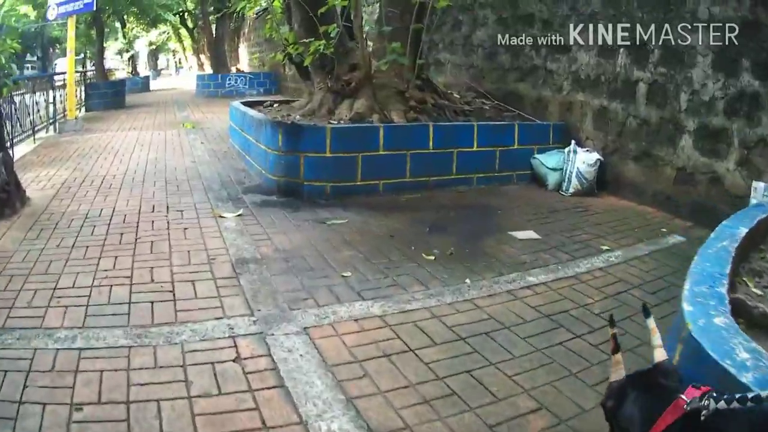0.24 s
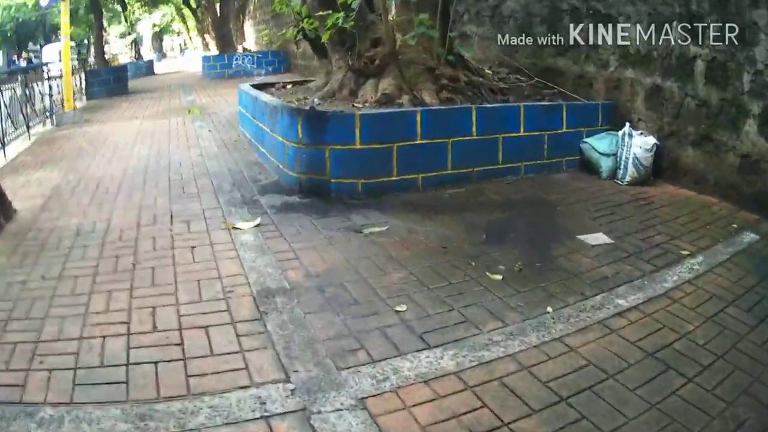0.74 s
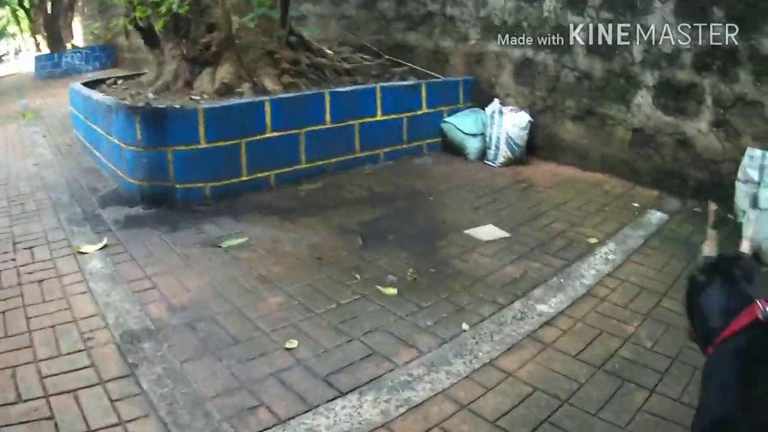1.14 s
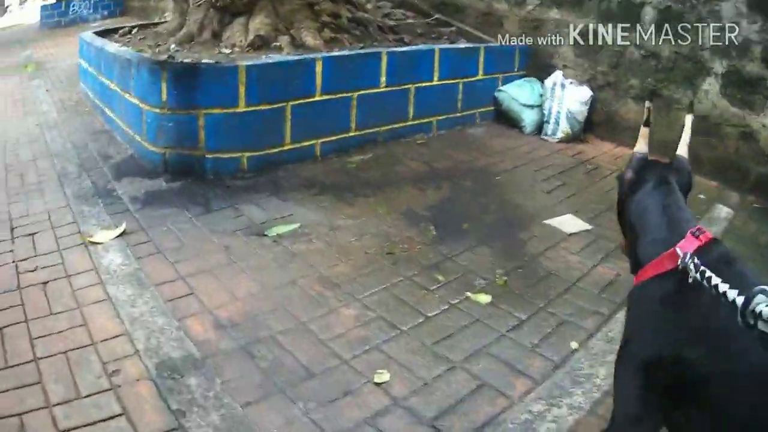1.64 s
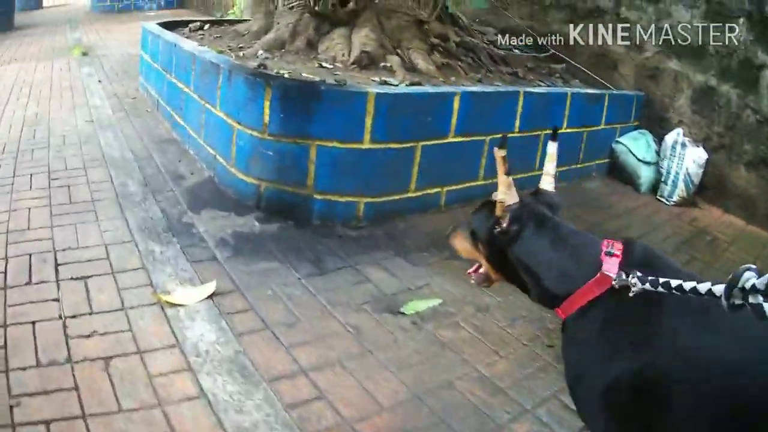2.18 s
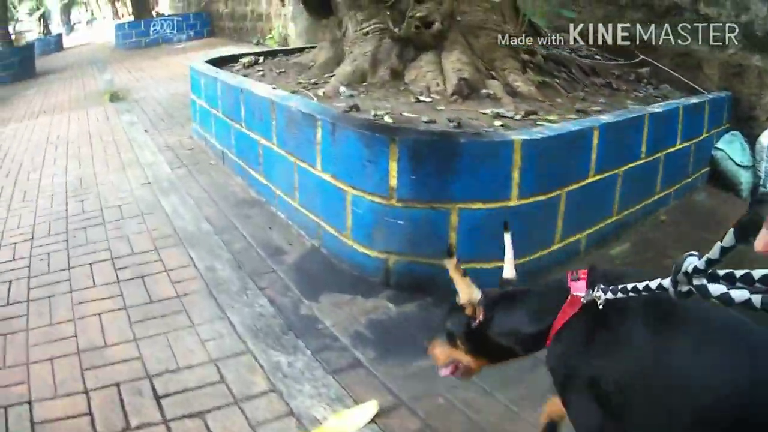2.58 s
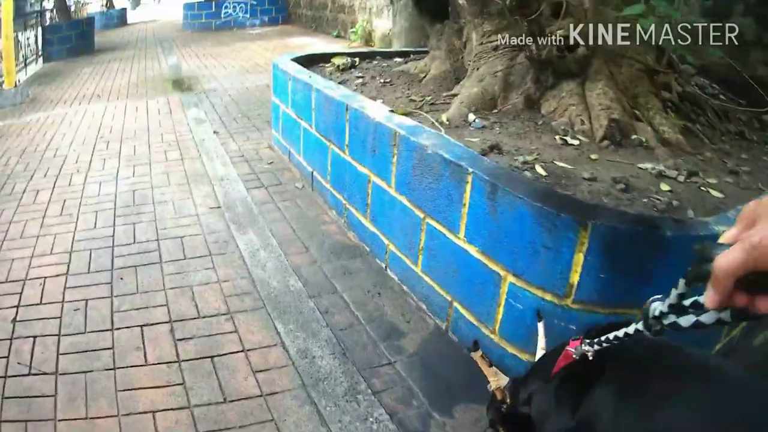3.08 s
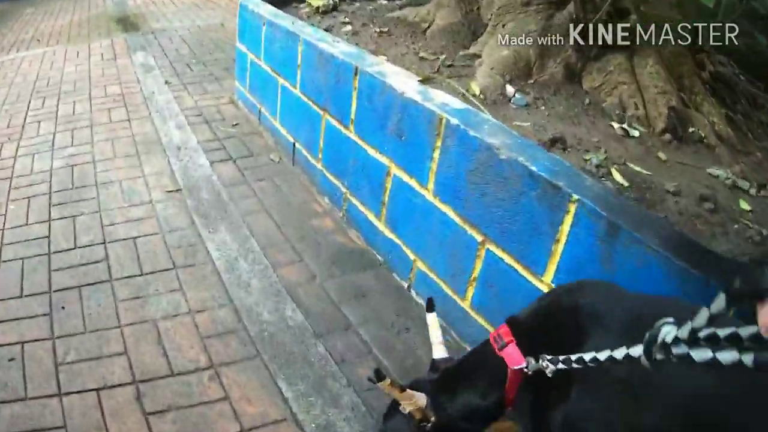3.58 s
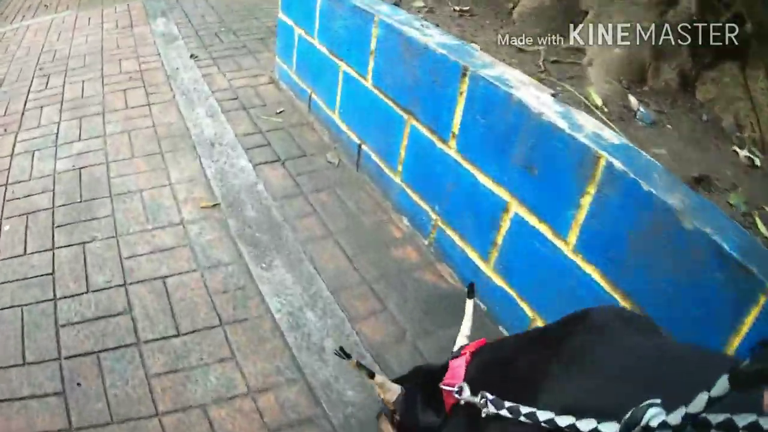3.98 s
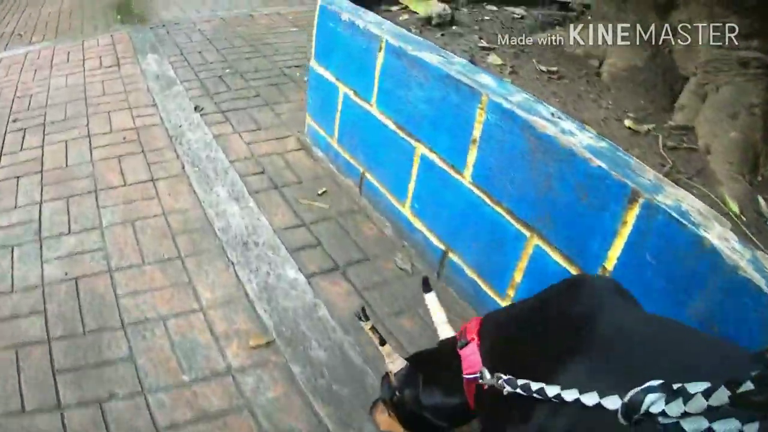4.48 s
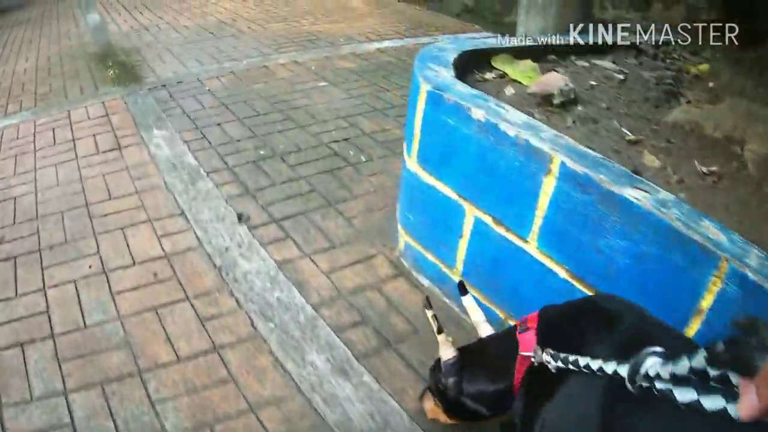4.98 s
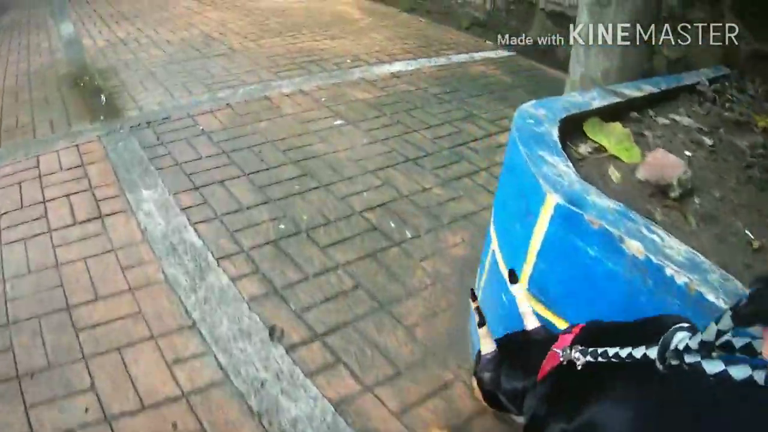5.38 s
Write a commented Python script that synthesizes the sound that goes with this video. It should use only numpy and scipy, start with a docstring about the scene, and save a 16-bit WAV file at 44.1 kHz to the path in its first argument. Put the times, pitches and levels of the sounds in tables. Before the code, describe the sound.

Outdoors on a paved path, birds call and whistle with soft echo while a dog's lead clicks, air rumbles on the microphone, and a closer warbler finishes.

```python
"""Far birds call hoarsely deep in the trees, over town murmur, a motor's hum and air on a hand-held microphone.
A dog's lead clicks close by; a whistler sends high arches past a walled, paved park path, and a bump thuds.
Later a nearer bird warbles low phrases with thin peeps among them, and a small one twitters at the end.
Birds are sine tones that follow drawn pitch lines, with random shake and decaying noise as the park's echo;
murmur and air are shaped noise, the motor two wavering tones, the clicks struck modes, the bumps pressure pulses."""
import sys
import numpy as np
from scipy import signal
from scipy.fft import rfft, irfft, next_fast_len
from scipy.io import wavfile
from scipy.ndimage import uniform_filter1d

SR = 44100
rng = np.random.default_rng(int(sys.argv[2]) if len(sys.argv) > 2 else 0)


def unload_wav(signal):
    """Save mono or channel-first audio to the path in sys.argv[1] as 16-bit WAV at rate SR, clipped to [-1, 1]."""
    wavfile.write(
        sys.argv[1],
        SR,
        np.round(np.clip(np.atleast_2d(signal).T, -1, 1) * 32767).astype(np.int16),
    )


N = 248283
TIME = np.arange(N) / SR

# phrases of the near warbler, a short chirr, a pause, and a slur that climbs and drops into a trill:
# [t/s, chirr length/s, chirr f/Hz, chirr level/dB, pause/s, climb/s, drop/s, top f/Hz, slur level/dB]
WARBLE_PHRASES = [ (4.087, .05, 1871, -19.5, .045, .053, .035, 2421, -19.5),
                  (4.527, .023, 1790, -20, .111, .031, 0.049, 2536, -21.5),
                  (5.008, .047, 1784, -24, .079, .051, 0.015, 2556, -22)]


def from_db(db):
    """Decibels to gain."""
    return 10 ** (np.asarray(db) / 20)


def rms_one(x):
    """Scale to rms 1."""
    return x / np.sqrt(np.mean(x ** 2) + 1e-20)


def level(rows):
    """Gain over time from rows of [t/s, level/dB]."""
    return from_db(np.interp(TIME, *np.transpose(rows)))


def low_pass(x, hz, order=2):
    """Causal Butterworth low-pass."""
    return signal.sosfilt(signal.butter(order, min(hz, .45 * SR), fs=SR, output="sos"), x + 1e-18)


def drift(rate_hz):
    """Random wander up to about the given rate; rms 1."""
    settled = low_pass(rng.standard_normal(N + SR), rate_hz)[SR:]
    return rms_one(settled)


def noise(colour):
    """Noise with the spectrum in rows of [f/Hz, relative level/dB]; rms 1."""
    hz, db = np.transpose(colour)
    size = next_fast_len(N)
    bins = np.maximum(np.fft.rfftfreq(size, 1 / SR), 1)
    gain = from_db(np.interp(np.log(bins), np.log(hz), db))
    return rms_one(irfft(rfft(rng.standard_normal(size)) * gain, size)[:N])


def turning(hz):
    """Phase of an oscillator that follows a pitch."""
    return 2 * np.pi * np.cumsum(hz) / SR


def song(notes, glide_s, fade_s):
    """Pitch, gain and roughness from (s, Hz, dB, 0-1) points; the syrinx rounds corners and fades between notes."""
    hz, gain, rough = np.full(N, 2000.), np.zeros(N), np.zeros(N)
    glide = max(1, int(glide_s * SR))
    for note in notes:
        s, pitch, db, depth = np.transpose(sorted(note))
        on = (TIME > s[0] - fade_s) & (TIME < s[-1] + fade_s)
        t = TIME[on]
        edge = np.clip(np.minimum(t - s[0], s[-1] - t) / fade_s + 1, 0, 1)
        hz[on] = uniform_filter1d(np.interp(t, s, pitch), glide, mode="nearest")
        gain[on] = from_db(np.interp(t, s, db)) * np.sin(np.pi / 2 * edge) ** 2
        rough[on] = np.interp(t, s, np.clip(depth, 0, 1))
    return hz, np.sqrt(2) * gain, rough  # root two: the levels are those of a sine's rms


def park(x, t60, build_s):
    """Diffuse echo of trunks, leaves and walls: it builds up, then dies away; unit energy."""
    t = TIME[:SR]
    echo = rng.standard_normal(SR) * from_db(-60 * t / t60) * (1 - np.exp(-t / build_s))
    return signal.fftconvolve(x, echo / np.sqrt(np.sum(echo ** 2)))[:N]


def town_murmur():
    """The town beyond the park: broad noise that slowly rises and falls."""
    # swell of the murmur: [t/s, level/dB]
    town_level = [(0, -51.5), (2.3, -54.5), (3, -49.5), (4.8, -49.5), (5.63, -56)]
    # its spectrum: [f/Hz, relative level/dB]
    town_colour = [(140, 0.5), (350, -4), (650, -8.5), (900, -4.5), (1150, 0.5), (1350, -10), (2500, -2.5),
                   (4400, -41), (7000, -39.5), (9000, -54), (15000, -48)]
    return level(town_level) * noise(town_colour)


def wind():
    """Air on the microphone: deep noise that comes in swells and flutters at random."""
    # swells before the flutter: [t/s, level/dB]
    wind_level = [(0, -48.5), (.5, -32.5), (1.15, -33), (1.5, -48), (2.55, -46), (2.8, -36.5), (3.4, -48.5),
                  (3.7, -49), (5.1, -46.5), (5.63, -51)]
    # spectrum of the air noise: [f/Hz, relative level/dB]
    wind_colour = [(15, 4), (35, -10), (80, -13), (320, -32.5), (800, -78.5)]
    flutter = from_db(2.5 * drift(9))
    return level(wind_level) * flutter * noise(wind_colour)


def motor(hum_hz=102.5, drone_hz=56.8, hum_trim_db=-1, drone_trim_db=-1):
    """A distant motor: two low tones, hum and drone, whose pitch wavers a little."""
    # the hum before its trim: [t/s, level/dB]
    hum_level = [(0, -52), (1.1, -43.5), (2.4, -43.5), (3.95, -45), (4.25, -55.5), (5.63, -54.5)]
    # the drone before its trim: [t/s, level/dB]
    drone_level = [(0, -58), (3.9, -59), (4.7, -43.5), (5.63, -65.5)]
    hum_phase = turning(hum_hz * (1 + 0.0081 * drift(0.99)))
    drone_phase = turning(drone_hz * (1 + 0.0053 * drift(9)))
    hum = from_db(hum_trim_db) * level(hum_level) * np.sin(hum_phase)
    drone = from_db(drone_trim_db) * level(drone_level) * np.sin(drone_phase)
    return np.sqrt(2) * (hum + drone)


FAR_FADE_S = 0.022  # fade at both ends of a far call


def far_call(s, length_s, first_hz, last_hz, db, hoarse, fade_db=4, settle=2.5):
    """A call slides exponentially towards its last pitch (settle: time constants per call) while it fades."""
    u = np.linspace(0, 1, 8)
    hz = last_hz + (first_hz - last_hz) * np.exp(-settle * u)
    return list(zip(s + u * length_s, hz, db - fade_db * u, np.full_like(u, hoarse)))


def far_birds(jitter=0.0919, foliage_cut_hz=3640, direct_db=-5, near_db=-5, wet_db=-4.5):
    """Two birds deep in the trees share the calls, hoarse and fluttering, blurred by the foliage."""
    # calls, before the mix: [t/s, length/s, first f/Hz, last f/Hz, level/dB, hoarseness/0-1]
    far_calls = [ (0, 0.078, 2050, 1868, -47, 0.9), (.158, 0.054, 2368, 2270, -38, 0.77),
                 (0.201, .1, 1950, 1728, -45.5, 0.77), (.35, 0.1, 2642, 2400, -46.5, 0.66),
                 (0.338, 0.14, 2060, 2015, -40, .35), (0.487, 0.17, 2420, 2340, -40.5, 0.48),
                 (.59, 0.11, 1855, 1611, -44, 0.67), (.68, 0.17, 2450, 2347, -43.5, 0.3),
                 (.74, .34, 2060, 1982, -43.5, 0.43), (2.819, 0.067, 2000, 1580, -39.5, 0.97),
                 (2.975, 0.18, 1960, 1931, -34.5, 0.39), (3.239, 0.077, 1960, 1910, -39, 0.39),
                 (3.338, .035, 2750, 2360, -36.5, .95), (3.368, .08, 1823, 1644, -37, .95),
                 (3.5, 0.057, 1920, 1881, -37.5, .85), (3.575, 0.12, 1890, 1866, -29, 0.07),
                 (3.661, .14, 2145, 1876, -37.5, 0.82), (3.826, .02, 3010, 2748, -41.5, .95),
                 (3.848, .08, 2584, 2412, -26, .75), (4.002, 0.068, 2400, 2056, -33.5, 0.72)]
    voice = 0
    for calls in (far_calls[::2], far_calls[1::2]):
        notes = [far_call(*row) for row in calls]
        hz, gain, rasp = song(notes, glide_s=0.0047, fade_s=FAR_FADE_S)
        flutter = from_db(3.9 * rasp * drift(71))
        phase = turning(hz * (1 + jitter * rasp * drift(260)))
        voice = voice + gain * flutter * np.sin(phase)
    voice = low_pass(voice, foliage_cut_hz, order=5)
    leaves = from_db(near_db) * park(voice, t60=0.027, build_s=0.0076)
    return from_db(direct_db) * voice + leaves + from_db(wet_db) * park(voice, t60=0.88, build_s=0.0057)


def lead_clicks(soft_hz=2400):
    """Short dull clicks of the lead close by, each striking all the decaying modes of its clip."""
    # strikes: [t/s, level/dB]
    clicks = [(.552, -25.5), (.682, -29.5), (.847, -32), (.987, -38.5), (1.737, -34.5), (1.851, -35),
              (2.823, -32.5)]
    click_modes = [(700, -1, 0.0089), (1030, -8, 0.022), (1774, 3.5, 0.018)]
    taps, out = np.zeros(N), 0
    for s, db in clicks:
        taps[int(s * SR)] = from_db(db)
    for k, (hz, db, t60) in enumerate(click_modes):
        r = from_db(-60 / (t60 * SR))  # decay per sample
        w = 2 * np.pi * hz / SR
        ring = signal.lfilter([0, np.sin(w)], [1, -2 * r * np.cos(w), r * r], taps + 1e-18)
        out = out + (-1) ** k * from_db(db) * ring
    return low_pass(out, soft_hz, order=4)


def arch(s, climb_s, fall_s, top_hz, bend, db, rasp, broken_db, broken_rasp):
    """One whistle: a parabola up, a bent line down, its rasp changing as the pitch gives way."""
    foot_hz, onset_db, onset_share = 2212, 19, 0.44  # starts low and weak, swells over this share of the climb
    strain_hz, strain_db_per_hz = 5100, .009  # the voice thins out above this pitch
    break_from, break_to, dying_db = .2, 0.422, 1.5  # shares of the pitch drop; loss at the foot
    u = np.linspace(-1, 1, 41)
    climb, fall = np.maximum(-u, 0), np.maximum(u, 0)
    drop = fall ** bend
    t = s + climb_s * (1 - climb) + fall_s * fall
    hz = top_hz - (top_hz - foot_hz) * (climb ** 2 + drop)
    broken = np.interp(drop, [break_from, break_to], [0, 1])
    onset_loss = onset_db * np.maximum(1 - (1 - climb) / onset_share, 0)
    strain_loss = strain_db_per_hz * np.maximum(hz - strain_hz, 0)
    loss_db = onset_loss + strain_loss + dying_db * drop ** 4
    note_db = db + broken * (broken_db - db) - loss_db
    return list(zip(t, hz, note_db, rasp + broken * (broken_rasp - rasp)))


def peep(s, length_s, top_hz, db, foot_hz=2730, edge_db=3):
    """A shallow, even arch of pure tone, loudest at its top and weaker at both ends."""
    u = np.linspace(0, 1, 15)
    sag = (2 * u - 1) ** 2
    hz = top_hz - (top_hz - foot_hz) * sag
    return list(zip(s + u * length_s, hz, db - edge_db * sag, np.zeros_like(u)))


def whistler(waver=.009, jitter=0.12, hiss_db=-12.0, direct_db=-4.5, scatter_db=-3, wet_db=-3):
    """Arched whistles and peeps; low raspy tones turn reedy, and rasp shakes the pitch and adds hiss."""
    # arches, before the mix: [t/s, climb/s, fall/s, top f/Hz, bend of the fall (1 = straight), level/dB,
    # rasp/0-1, level once broken/dB, rasp once broken/0-1]
    whistles = [ (.79, .095, .15, 3110, 1.3, -47, 0.023, -49.5, .9),
                (1.413, 0.1, 0.041, 3900, .9, -44, 0.19, -40, 1),
                (1.72, 0.11, 0.072, 5498, 3.8, -39, 0.034, -42, .8),
                (2.146, .104, .164, 5250, 1.35, -36, .028, -40.5, 0.74),
                (2.555, .096, 0.035, 3930, .8, -35.5, 0.17, -33, 0.89),
                (2.837, 0.11, 0.06, 5790, 3.1, -37.5, .04, -35, 0.37)]
    # thin, clean peeps, before the mix: [t/s, length/s, top f/Hz, level/dB]
    peeps = [(3.1, .22, 3600, -66.5), (4.41, 0.1, 3032, -48.5), (5.018, .122, 3083, -55.5),
             (5.477, 0.18, 3440, -63.5)]
    # spectrum of the hiss: [f/Hz, relative level/dB]
    rasp_colour = [(1200, -13.5), (2200, -2.5), (5000, 8.5), (7800, -23), (8500, -22), (13000, -42.5)]
    reedy_below_hz, pure_above_hz = 3600, 4700  # overtones sound only in the low register
    fifth_db, octave_db = -13, -23  # reedy partials against the main tone
    wall_echo_s, wall_echo_db = 0.023, -13.5  # the whistle comes back once from the stone wall
    notes = [arch(*row) for row in whistles] + [peep(*row) for row in peeps]
    hz, gain, rasp = song(notes, glide_s=0.008, fade_s=0.012)
    phase = turning(hz * (1 + (waver + jitter * rasp ** 3) * drift(370)))
    low_register = np.interp(hz, [reedy_below_hz, pure_above_hz], [1, 0])
    reedy = np.clip(12 * rasp - .6, 0, 1) * low_register
    partials = from_db(fifth_db) * np.sin(3 * phase / 2) + from_db(octave_db) * np.sin(2 * phase)
    tone = np.sin(phase) + reedy * partials
    hiss = np.minimum(20 * rasp, 1) ** 2 * from_db(hiss_db) * noise(rasp_colour)
    voice = low_pass(gain * (tone + hiss), 8200, order=7)
    wall = from_db(wall_echo_db) * np.interp(TIME - wall_echo_s, TIME, voice)
    # the branches send the note back within milliseconds, so it thickens and beats against itself
    scatter = from_db(scatter_db) * park(voice, t60=0.017, build_s=0.0025)
    return from_db(direct_db) * voice + wall + scatter + from_db(wet_db) * park(voice, t60=0.82, build_s=0.0069)


def bumps(dull_hz=110, stop=.505):
    """Pressure builds on the microphone port, lets go and swings back; the big bump bottoms out in a dull knock."""
    # bumps, before dulling: [t/s, push level/dB, rebound level/dB, build-up/s, recovery/s]
    bump_rows = [(1.2238, 2.5, -5, 0.0059, 0.017), (3.366, -16.5, -34, 0.0076, .03)]
    pressure = np.zeros(N)
    for s, push_db, rebound_db, build_s, recover_s in bump_rows:
        apart = np.abs(TIME - s)
        push = from_db(push_db) * np.exp(-apart / build_s)
        rebound = -from_db(rebound_db) * np.exp(-apart / recover_s)
        pressure += np.where(TIME < s, push, rebound)
    saturated = np.clip(low_pass(pressure, dull_hz, order=1), -stop, stop)
    return low_pass(saturated, 910, order=1)


def warble_notes():
    """Two notes a phrase: the level chirr, then the slur with its sagging trill."""
    chirr_depth, slur_depth, trill_depth = 0.86, 0.028, 1  # how deeply each part throbs, 0-1
    slur_from_hz, slur_bend, slur_swell_db = 2130, 1.8, 2.5  # the climb steepens and swells
    trill_s, trill_from_hz, trill_sag_hz = .093, 1927, 89.7
    trill_from_db, trill_fade_db = -23.5, 3
    notes, u = [], np.linspace(0, 1, 8)
    for s, chirr_s, chirr_hz, chirr_db, pause_s, climb_s, drop_s, top_hz, db in WARBLE_PHRASES:
        notes.append([(t, chirr_hz, chirr_db, chirr_depth) for t in (s, s + chirr_s)])
        slur_at = s + chirr_s + pause_s
        trill_at = slur_at + climb_s + drop_s
        climb_hz = slur_from_hz + (top_hz - slur_from_hz) * u ** slur_bend
        climb_db = db - slur_swell_db * (1 - u)
        climb = list(zip(slur_at + u * climb_s, climb_hz, climb_db, np.full_like(u, slur_depth)))
        trill = [(trill_at + k * trill_s, trill_from_hz - k * trill_sag_hz,
                  trill_from_db - k * trill_fade_db, trill_depth) for k in (0, 1)]
        notes.append(climb + trill)
    return notes


def scrapes(level_db=-38, weaker_db=4, lead_s=0.0036, width_s=0.011):
    """Each phrase opens with a short hoarse burst of noise, weaker from phrase to phrase."""
    gain = 0
    for k, row in enumerate(WARBLE_PHRASES):
        from_peak_s = TIME - row[0] + lead_s
        gain = gain + from_db(level_db - weaker_db * k) * np.exp(-.5 * (from_peak_s / width_s) ** 2)
    return gain * noise([(1300, -20), (1700, 8), (2400, 4.5), (3400, -9), (4300, -25), (6500, -36), (12000, -51)])


def warbler(trill_hz=52, swing=0.029, throb=0.92, second_db=-37, third_db=-38, edge_db=-49,
            scatter_db=-12, wet_db=-8):
    """Chirrs and clean slurs that break into a trill, in which pitch and loudness throb together."""
    hz, gain, depth = song(warble_notes(), glide_s=0.012, fade_s=.006)
    trill = turning(trill_hz * (1 + 0.11 * drift(27.2)))
    shake = (0.0025 + 0.018 * depth) * drift(220)
    phase = turning(hz * (1 + swing * depth * np.sin(trill) + shake))
    gain = gain * (1 - min(throb, 1) * depth * (1 + np.sin(trill + 1.94)) / 2)
    voice = gain * np.sin(phase) + scrapes()
    # overtones flicker up with effort, and the highest peaks get a sharp edge
    effort = gain / gain.max()
    second = (1 - depth / 2) * from_db(second_db) * np.sin(2 * phase)
    third = depth * from_db(third_db) * np.sin(3 * phase)
    overtones = effort * drift(90) * (second + third)
    edge_gain = from_db(edge_db + 7.5 * (hz / 2400) ** 20)
    edge = effort * edge_gain * noise([(2000, 2.5), (7000, 0), (14000, -11)])
    scatter = from_db(scatter_db) * park(voice, t60=0.12, build_s=0.0047)
    return voice + gain * (overtones + edge) + scatter + from_db(wet_db) * park(voice, t60=0.79, build_s=0.0077)


def flicks(db, count):
    """A zigzag of flicks from one top pitch, deep and shallow in turn; the deep ones fade as they drop."""
    start_s, per_s, rise_s = 5.533, 68, 0.0013
    top_hz, deep_hz, shallow_hz, deep_loss_db = 6620, 3790, 5650, 3.5  # corners, before the glide rounds them
    deep, shallow = (deep_hz, db - deep_loss_db, 0), (shallow_hz, db, 0)
    note = [(start_s, *deep)]
    for k in range(count):
        s = start_s + k / per_s
        note.append((s + rise_s, top_hz, db, 0))
        note.append((s + 1 / per_s, *(shallow if k % 2 else deep)))
    return [note]


def small_bird(level_db=-45, jitter=0.052, wet_db=-3):
    """A very fast zigzag twitter: one sine whose pitch also shakes at random."""
    hz, gain, _ = song(flicks(level_db, count=5), glide_s=0.0076, fade_s=0.00221)
    voice = gain * np.sin(turning(hz * (1 + jitter * drift(870))))
    return voice + from_db(wet_db) * park(voice, t60=0.33, build_s=0.0053)


def scene():
    """Birds over the town's murmur and a far motor, with the lead and microphone sounds close by."""
    background = town_murmur() + wind() + motor()
    birds = far_birds() + whistler() + warbler() + small_bird()
    return (background + birds + lead_clicks() + bumps())[None]


def record(dry, split_hz=900, ceiling_db=-23.5, window_s=0.0019, cutoff_hz=15400):
    """A fast limiter holds down the treble band, so the loudest notes get flat tops; the top is cut."""
    bass = signal.sosfiltfilt(signal.butter(2, split_hz, fs=SR, output="sos"), dry)
    treble = dry - bass
    envelope = np.abs(signal.hilbert(treble, next_fast_len(N))[:, :N])
    loudness = uniform_filter1d(envelope, max(1, int(window_s * SR)))
    limited = treble / np.maximum(1, loudness / from_db(ceiling_db))
    return signal.sosfilt(signal.cheby2(12, 70, cutoff_hz, fs=SR, output="sos"), bass + limited)


dry = scene()
out = record(dry)
unload_wav(out)
```